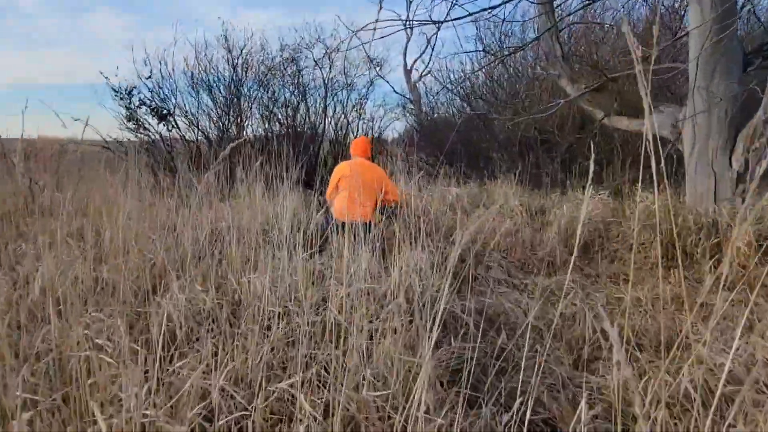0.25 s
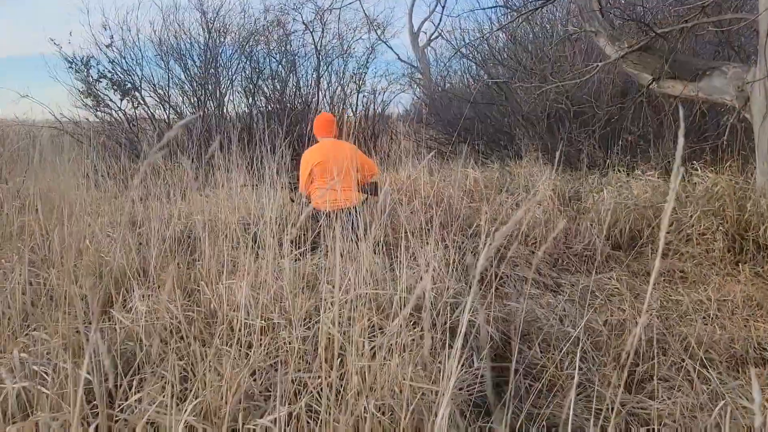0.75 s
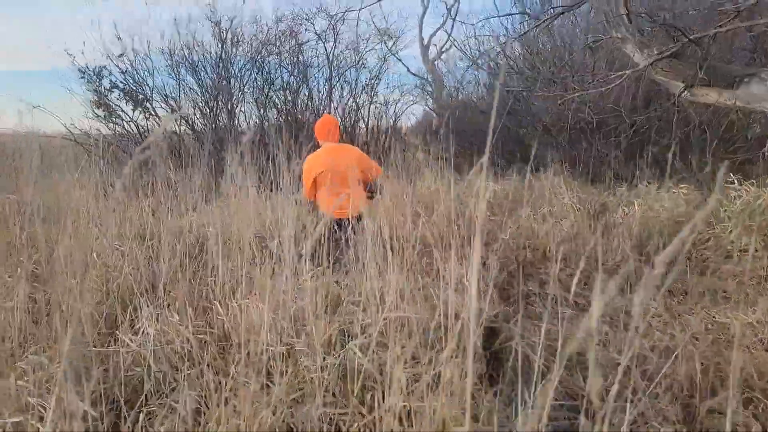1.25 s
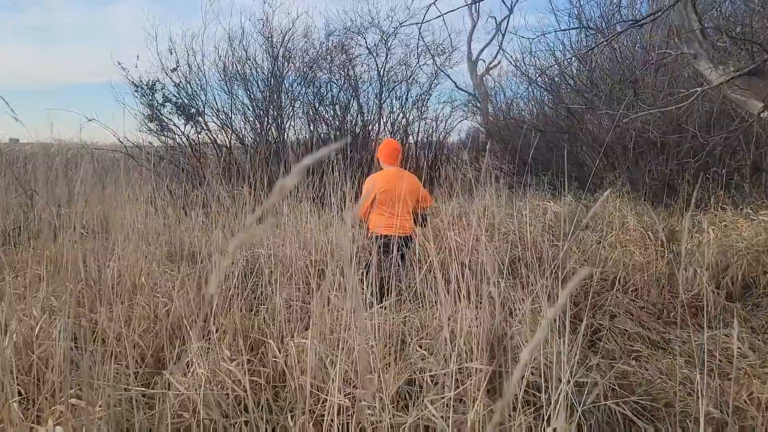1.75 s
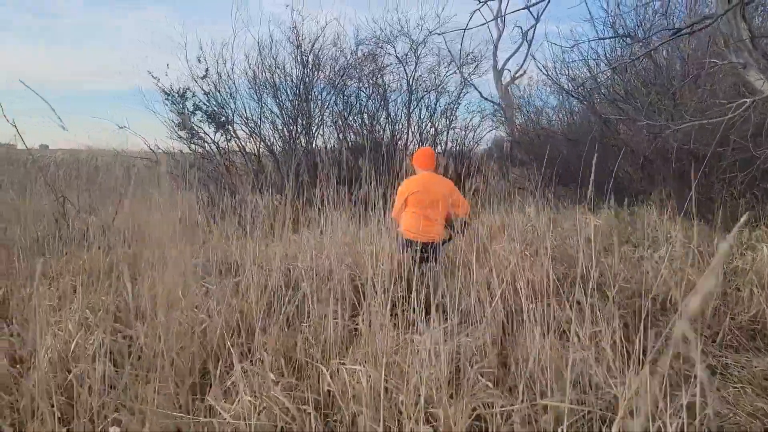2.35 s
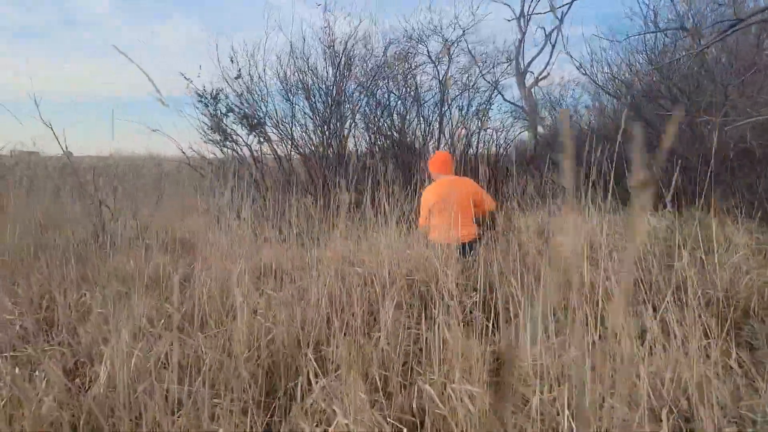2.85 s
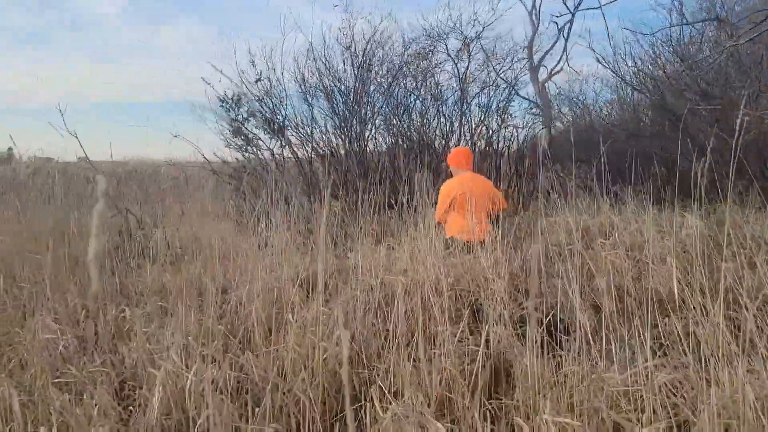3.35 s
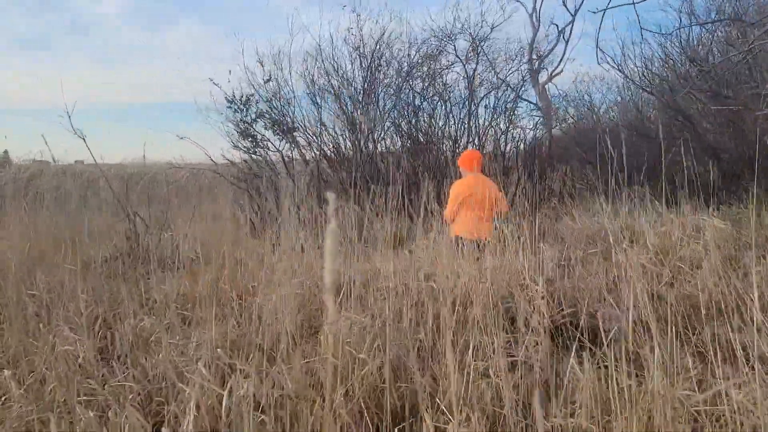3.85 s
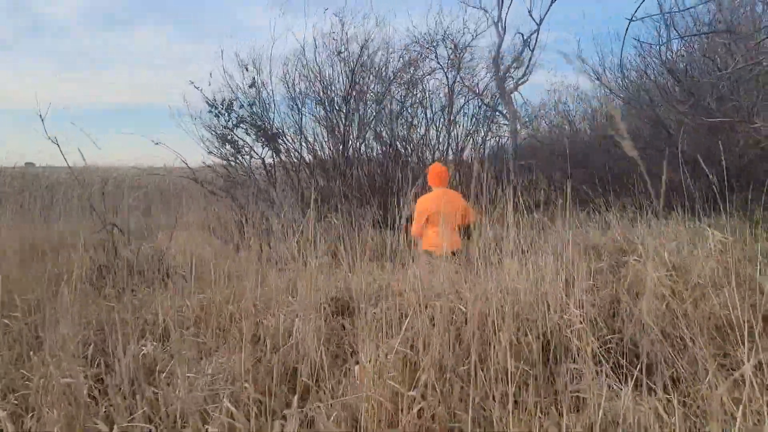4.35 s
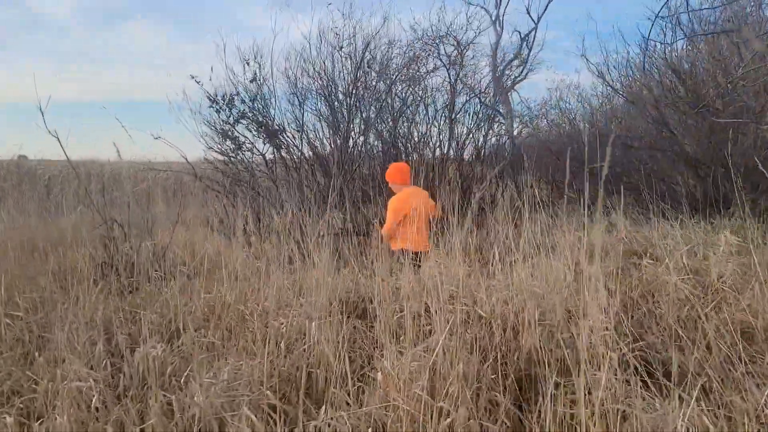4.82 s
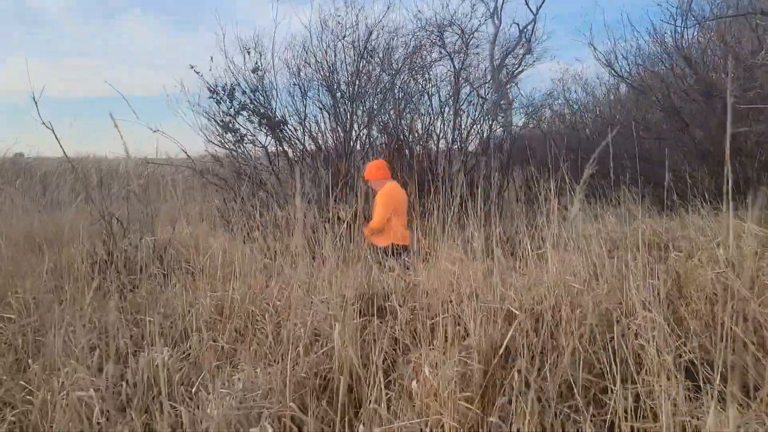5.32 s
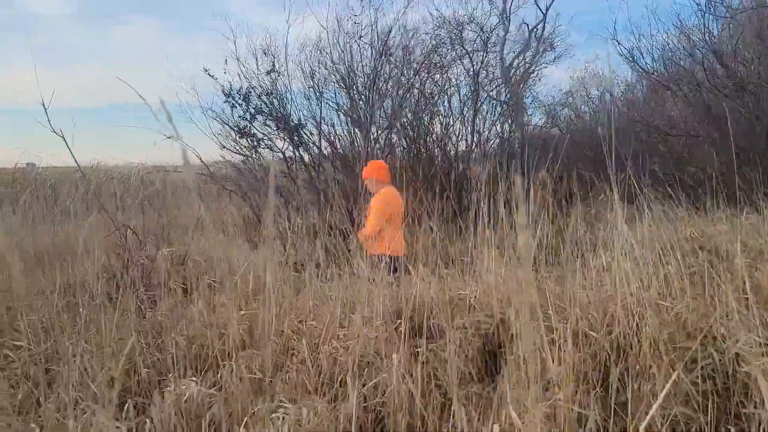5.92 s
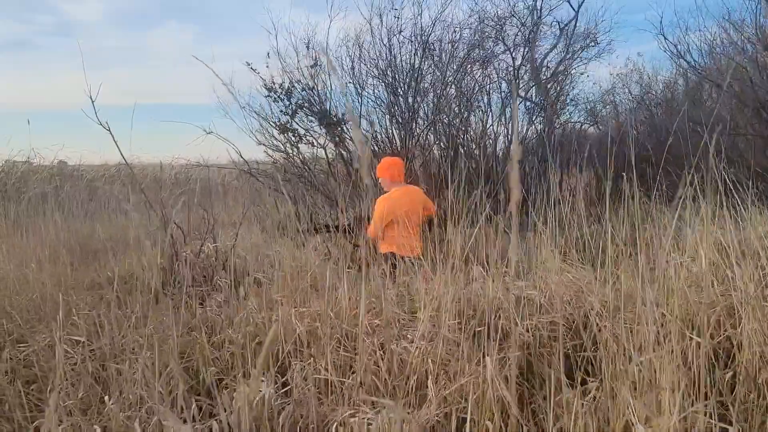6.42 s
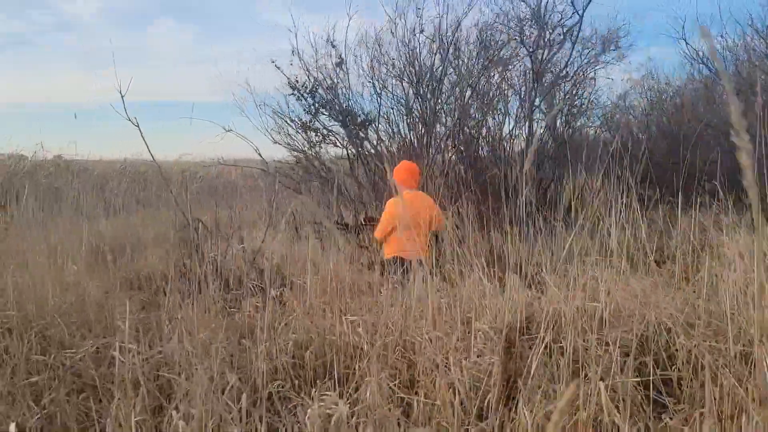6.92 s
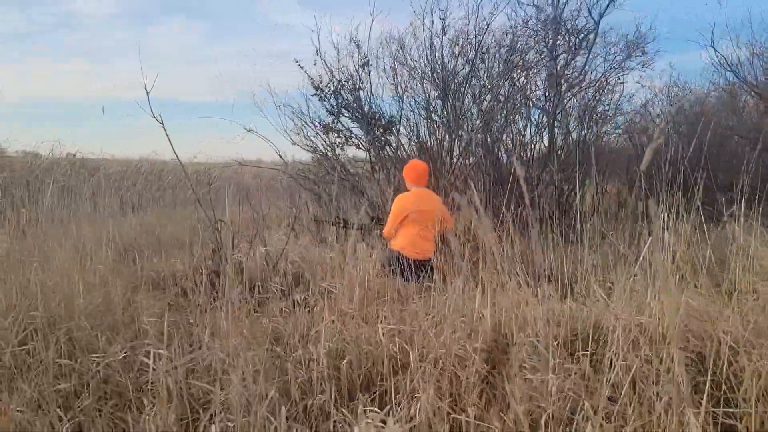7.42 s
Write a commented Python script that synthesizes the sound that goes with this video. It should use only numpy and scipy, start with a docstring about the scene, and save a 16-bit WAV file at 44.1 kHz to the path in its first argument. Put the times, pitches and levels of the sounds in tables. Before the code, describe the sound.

Close, dry swishing rises and falls with each stride as someone wades through a field of tall dead grass, while a second walker rustles more dully a little to the right. Boots land softly, crushing stems, and brittle stalks crack here and there. Low gusts rumble on the moving microphone, strongest soon after the start. Midway, blades tick sharply past, later a cluster of louder stalks breaks, and both keep walking.

```python
"""Two people walk through tall dry grass in a light wind, one close by, one further off to the right.
A thin swish on the left opens the scene. Then, stride after stride, legs sweep the blades and crush
stems underfoot, stalks snap and boots land softly. Soon after 1 s the strongest gusts buffet the two
microphone openings. Near 2 s comes the heaviest step, near 3.5 s blades flick sharply past, and just
after 6 s the loudest stalks break. Both walkers rustle on to the end."""
import sys
import numpy as np
from scipy import signal
from scipy.fft import rfft, irfft, next_fast_len
from scipy.io import wavfile
from scipy.ndimage import uniform_filter1d, map_coordinates

SR = 44100
rng = np.random.default_rng(int(sys.argv[2]) if len(sys.argv) > 2 else 0)


def to_wav(s):
    """Save 16-bit WAV."""
    ch = np.atleast_2d(s).T  # columns
    pcm = np.round(np.clip(ch, -1, 1) * 32767)  # PCM
    wavfile.write(sys.argv[1], SR, pcm.astype(np.int16))


N = 338247
SIDES = np.array([[1], [-1]])  # left, right; a balance in dB is the left level minus the right


def amp(db):
    """Turns a level in dB into a gain."""
    return 10 ** (np.asarray(db) / 20)


def unit(x):
    """Scales x to an average power of 1."""
    return x / np.sqrt(np.mean(x ** 2) + 1e-20)


def curve(rows):
    """Joins (time, value) points with straight lines, one value per sample."""
    return np.interp(np.arange(N) / SR, *np.transpose(rows))


def wobble(rate):
    """A smooth curve through `rate` random values a second."""
    knots = rng.standard_normal(int(N * rate / SR) + 4)
    return map_coordinates(knots, [np.arange(N) * rate / SR])


def coloured(x, points):
    """Filters x to follow (frequency, level) points; the filter rings after a sound, never before."""
    m = 16384
    hz, db = np.transpose(points)
    gain = amp(np.interp(np.log(np.fft.rfftfreq(m, 1 / SR) + 1), np.log(hz + 1), db))
    cepstrum = irfft(np.log(gain), m)
    cepstrum[1:m // 2] *= 2
    cepstrum[m // 2 + 1:] = 0
    response = irfft(np.exp(rfft(cepstrum)), m)
    size = next_fast_len(N + m, real=True)
    return irfft(rfft(x, size) * rfft(response, size), size)[..., :N]


def crackle(spectrum, count, spread_db, lag_s, scatter_s):
    """Tiny random clicks; each has its own direction, so its own delay from left to right."""
    when, size, direction = rng.random(count), rng.standard_normal(count), rng.standard_normal(count)
    size = size * amp(spread_db * rng.standard_normal(count))
    pad = 64
    left = pad + when * N
    right = left + SR * (lag_s + scatter_s * direction)
    clicks = [np.bincount(np.clip(at, 0, None).astype(int), size, N + pad)[pad:N + pad]
              for at in (left, right)]
    return unit(coloured(np.array(clicks), spectrum))


def patchy(x, depth_db):
    """Random gain in patches about 300 Hz by 60 ms: each bunch of grass has its own tone."""
    spectra = signal.stft(x, nperseg=512)[2]
    patches = uniform_filter1d(rng.standard_normal(spectra.shape[1:]), size=3, axis=0)
    patches = uniform_filter1d(patches, size=10, axis=1)
    return unit(signal.istft(spectra * amp(depth_db * unit(patches)), nperseg=512)[1][:, :N])


def swell(s, rise, hold, change_db, fall):
    """Power each millisecond: rises until time s, drifts for `hold` seconds, falls; slopes in dB/s."""
    t = np.arange(0, N / SR, .001) - s
    db = rise * np.minimum(t, 0) + change_db * np.clip(t / hold, 0, 1) - fall * np.maximum(t - hold, 0)
    return amp(db) ** 2


def gains(power):
    """Turns rows of power per millisecond into gain per sample."""
    ms = np.arange(N) / SR * 1000
    return np.array([np.interp(ms, np.arange(len(row)), np.sqrt(row)) for row in power])


def add(track, s, db, balance_db, shape, lag_s):
    """Places one short sound in both channels, the right one lag_s later."""
    for side, at in enumerate((round(s * SR), round((s + lag_s) * SR))):
        track[side, at:at + len(shape)] += amp(db + balance_db / 2 * SIDES[side, 0]) * shape


# tone of the wind's rumble: (frequency [Hz], level [dB])
WIND_TONE = [(15, -14), (30, -7), (48, -1.5), (80, -3), (110, -15.5), (200, -43), (1000, -46)]
# gusts: (time [s], hold [s], left level [dB], right level [dB])
WIND_GUSTS = [(0.15, 0.16, -50, -40), (1.218, .06, -21, -42), (1.33, .08, -20.5, -26),
              (1.45, 0.12, -24, -18), (1.66, .03, -41, -31), (1.82, 0.051, -33, -26), (2.07, .08, -27, -40),
              (2.24, 0.086, -21, -31), (2.6, .08, -23, -29), (2.77, .05, -40, -28),
              (2.925, 0.059, -36, -27), (3.45, .06, -30, -45), (4.08, .06, -36, -34),
              (4.552, 0.068, -26, -40), (4.95, .08, -26, -41), (5.073, 0.041, -25, -25),
              (5.202, 0.061, -25, -30), (5.3, .08, -33, -45), (5.47, 0.073, -48, -34),
              (6.774, 0.074, -41, -30)]
# single swirls of air: (time [s], level [dB], balance [dB])
WIND_SWIRLS = [(1.236, -23, 19), (1.334, -22, 16), (1.376, -26, -25), (1.409, -20, 24), (1.436, -11, 8),
               (1.454, -16, -8), (1.48, -19, -16), (1.544, -18, -12), (1.59, -26, -16), (1.655, -21, -12),
               (2.055, -23, 16), (2.181, -21, 14), (2.235, -22, -10), (2.27, -24, 14), (2.297, -19, 16),
               (2.615, -27, 16), (2.651, -24, 14), (2.765, -27, -8), (2.991, -32, -14), (4.11, -22, -4),
               (5.005, -23, 16), (5.071, -22, 20), (5.109, -21, -16), (5.209, -12.5, 15), (6.779, -29, -10),
               (6.88, -24, -10)]


def wind():
    """Churning air rumbles separately on each microphone opening; a swirl sucks, then pushes."""
    calm_power = amp(-42.5) ** 2
    gust_power = sum(swell(s, rise=90, hold=hold, change_db=0, fall=99) * amp(db)[:, None] ** 2
                     for s, hold, *db in WIND_GUSTS)
    lumps = amp(2.8 * np.array([wobble(16), wobble(15)]))
    rumble = unit(lumps * coloured(rng.standard_normal((2, N)), WIND_TONE))
    track, t = np.zeros((2, N + SR)), np.arange(SR // 8) / SR
    swirl = -1.8 * np.sin(2 * np.pi * 64 * t) * amp(-60 * t / 0.068) * (1 - np.exp(-t / 0.0027))
    for s, db, balance_db in WIND_SWIRLS:
        add(track, s, db, balance_db, swirl, lag_s=0.001)
    return gains(calm_power + gust_power) * rumble + track[:, :N]


# tone of grass heard from afar: (frequency [Hz], level [dB])
FAR_TONE = [(100, -12.5), (400, 1), (1300, 6), (2500, -10.5), (6000, -12), (16000, -16.5)]
# loudness of the far walker: (time [s], level [dB])
FAR_LEVELS = [(0.0, -23.5), (0.5, -27.5), (0.72, -29), (0.94, -23.5), (2.39, -23), (3.1, -25), (3.67, -26),
              (3.85, -25), (3.97, -31), (4.2, -22.5), (5.02, -27), (5.47, -28.5), (6.24, -22), (6.51, -28),
              (7.2, -27.5), (7.67, -30)]


def far_walker():
    """A dense rustle, dulled by distance, that reaches the right side first and a little louder."""
    rustle = crackle(FAR_TONE, count=200000, spread_db=2.5, lag_s=-.0003, scatter_s=.0001)
    return amp(curve(FAR_LEVELS) + 1.1 * wobble(4.7) - SIDES) * rustle


# a narrow hiss near 6 kHz: (frequency [Hz], level [dB])
SWISH_TONE = [(4500, -29), (5600, -9), (6000, -1), (6400, -6), (7500, -37)]


def swish():
    """Something smooth slides past the left microphone opening at the start."""
    level_db, balance_db = -20.5, 11
    hiss = unit(coloured(rng.standard_normal((2, N)), SWISH_TONE))
    power = swell(0.046, rise=62, hold=0.1, change_db=0.17, fall=150)
    return amp(level_db + balance_db / 2 * SIDES) * gains([power]) * hiss


# boots landing: (time [s], level [dB], pitch [Hz], balance [dB])
BOOT_STEPS = [(0.217, -3, 486, 1), (0.576, -15, 620, -4), (1.1226, -13, 520, 0), (1.232, -16, 510, -1),
              (1.69, -20, 590, -4), (1.948, 0, 724, -4), (2.055, -15, 520, -10), (2.147, -2, 600, 1),
              (2.056, -15, 191, -6), (2.209, -5, 590, -5), (2.526, -12, 566, -7), (2.581, -24, 360, -4),
              (2.834, -8, 427, -5), (2.9004, -14, 540, -14), (3.291, -22, 556, -9), (3.565, -6, 362, 2),
              (4.098, -11, 342, 0), (4.252, -16, 220, -4), (4.36, -10, 450, 1), (4.9395, -13, 270, -1),
              (5.225, -4, 530, 0), (5.42, -18, 370, -12.5), (5.646, -15, 480, -3), (5.947, -8, 520, -5),
              (6.084, -8, 440, 10), (6.129, -14, 540, -1), (6.2582, -8, 600, 7), (6.5144, -10, 390, 1),
              (6.779, -21, 220, -6), (6.847, -13, 600, -2), (7.152, -7.5, 560, 5), (7.474, -17, 340, -5)]


def boots():
    """Each boot gives one dull push; soft soil lets it last only a few cycles."""
    track, t = np.zeros((2, N + SR)), np.arange(SR // 20) / SR
    onset = 1 - np.exp(-t / 0.00052)
    for s, db, hz, balance_db in BOOT_STEPS:
        push = amp(-60 * t * hz / 6) * np.cos(2 * np.pi * hz * t)
        add(track, s, db, balance_db, push * onset, lag_s=.0001)
    return track[:, :N]


# blades flicking past: (time [s], level [dB], balance [dB])
BLADE_FLICKS = [(0.6191, -10, -9), (0.696, -12, -4), (1.3995, -9, -2), (2.8345, -9, -3), (2.8524, -8, -2),
                (2.9418, 0, -7), (2.9518, -6, -5), (3.1786, -13, -4), (3.5174, 3, -5), (3.5611, 0, -3),
                (3.5815, -3, -3), (4.189, -11, -1), (5.0414, -6, -6), (5.1552, -2, -6), (5.7725, -12, -4),
                (6.0328, -5, -2), (6.772, -10, -6), (6.895, -5, 2), (6.9317, -12, -7), (7.152, -7, -5)]


def blade_flicks():
    """Thin blades flick past the microphone, each with a bare, high tick."""
    track, t = np.zeros((2, N + SR)), np.arange(SR // 20) / SR
    for s, db, balance_db in BLADE_FLICKS:
        hz = 12000 * np.exp(0.074 * rng.standard_normal())
        tones = np.sin(2 * np.pi * hz * t) + 0.68 * np.sin(2 * np.pi * .55 * hz * t)
        tick = tones * amp(-60 * t / 0.0036)
        add(track, s, db, balance_db, tick / np.abs(tick).max(), lag_s=0.00008)
    return track[:, :N]


# stalks breaking: (time [s], level [dB], pitch [Hz], balance [dB], delay on the right [ms])
STALK_SNAPS = [(0.22, -7, 1300, 0, .03), (0.43, -11, 2410, 3, .1), (0.671, -12, 1220, -3, 0.082),
               (0.828, -9, 3090, 2, .07), (1.287, -14, 1990, 0, 0), (1.7448, -7.5, 1450, -4, 0.14),
               (2.0678, -13, 2250, 3, .18), (2.444, -14, 2670, -1, .2), (2.4906, -3, 2050, -2, 0.22),
               (2.8255, -11, 2740, 0, 0.089), (2.834, -6, 2160, 0, .11), (2.851, -9, 1500, 2, .14),
               (2.8718, -10, 2000, 3, .1), (2.9843, -13, 1690, -3, 0.072), (3.704, -13, 2090, -2, 0.22),
               (3.812, -5.5, 1390, -1, 0.049), (4.1, -13, 1500, 0, .1), (4.227, -14, 1300, 0, .1),
               (4.355, -10, 3380, -3, 0.12), (4.94, -7, 1960, 0, 0.093), (5.0415, -6, 1890, 3, .07),
               (6.1313, 0, 2350, 2, 0.13), (6.1444, -6, 2100, -6, 0.2), (6.2599, -3, 2000, 0, .16),
               (6.2614, -3, 2300, -3, .16), (6.305, -11, 2390, 1, .18), (6.344, -13, 1150, 2, .1),
               (6.367, -14, 1600, -2, 0.22), (6.582, -16, 1300, 0, 0), (6.7163, -4.5, 2800, 0, 0.12),
               (7.5922, -16, 2660, -6, 0.12), (7.612, -12, 2390, 4, 0.091)]


def stalk_snaps():
    """A thick stalk cracks, bends as it parts and rings briefly at its pitch."""
    track, t = np.zeros((2, N + SR)), np.arange(SR // 20) / SR
    for s, db, hz, balance_db, lag_ms in STALK_SNAPS:
        ring = amp(-60 * t / 0.005) * (np.sin(2 * np.pi * hz * t) + 0.23 * np.cos(np.pi * hz * t))
        bend = 0.22 * amp(-60 * t / 0.017) * np.cos(2 * np.pi * hz / 4 * t)
        crack = 0.45 * amp(-60 * t / 0.0033) * uniform_filter1d(rng.standard_normal(len(t)), size=4)
        add(track, s, db, balance_db, ring + bend + crack, lag_s=lag_ms / 1000)
    return track[:, :N]


# tone of the dead grass on the ground: (frequency [Hz], level [dB])
MAT_TONE = [(80, -5), (150, -3), (500, 1.5), (900, -4), (3000, -21.5)]
# its base loudness: (time [s], level [dB])
MAT_LEVELS = [(0, -28.5), (.35, -42), (.8, -30.5), (1.5, -36), (2.0, -34), (2.3, -35), (2.52, -28),
              (2.75, -37), (3.3, -38), (3.55, -29), (3.95, -47), (4.2, -33), (4.6, -34), (5.0, -34.5),
              (5.6, -41.5), (6.1, -27), (6.6, -38.5), (7.15, -30), (7.4, -36), (7.67, -30)]


def dead_grass(stem_gain):
    """The mat of dead grass gives way underfoot, louder while stems are being crushed."""
    crunch = crackle(MAT_TONE, count=20000, spread_db=0, lag_s=.0001, scatter_s=.00029)
    return (amp(curve(MAT_LEVELS)) + amp(-17) * stem_gain) * amp(2.25 * wobble(14)) * crunch


# tones of dry tips, blades and stems: (frequency [Hz], level [dB])
TIP_TONE = [(3000, -39), (8000, 1), (11000, -1), (16000, 1.5)]
BLADE_TONE = [(300, -40), (1500, -11.5), (3000, -2.5), (5000, -1), (9000, 1), (16000, -12)]
STEM_TONE = [(100, -19), (400, -12.5), (900, 3.5), (2000, 2), (3500, 2.5), (7000, -40.5), (16000, -52)]
# a second tone for the rustle, fuller near 2 kHz, hollower near 4 kHz: (frequency [Hz], change [dB])
DRIFT_TONE = [(800, 1.5), (1400, -3), (2000, 2.5), (2500, -0.5), (3200, -3.5), (4300, -3.5), (5500, 1.5),
              (7000, 2.5), (9000, -2)]
# how much of that tone is heard: (time [s], share [0-1])
DRIFT_SHARE = [(0, 0.24), (1.5, 0.13), (2.3, 0.82), (3, 0.1), (3.7, 0.66), (4.4, 0.14), (5.1, 0.74),
               (5.8, 0.45), (6.8, 0.46), (7.3, 1), (7.67, 1)]


def standing_grass(blade_gain, tip_gain, stem_gain):
    """Tips, blades and stems crackle against a leg; bunches of grass make the level flutter."""
    bunch = wobble(20)
    tips = crackle(TIP_TONE, count=400000, spread_db=1.5, lag_s=.00015, scatter_s=.0001)
    blades = crackle(BLADE_TONE, count=250000, spread_db=0.5, lag_s=.00015, scatter_s=.00008)
    stems = crackle(STEM_TONE, count=60000, spread_db=0, lag_s=.00011, scatter_s=.00005)
    stalks = crackle(BLADE_TONE, count=2500, spread_db=2, lag_s=.00015, scatter_s=.00017)
    fizz = tip_gain * amp(0.73 * bunch + 0.25 * wobble(5.2)) * patchy(tips, depth_db=1.5)
    sweep = blade_gain * amp(0.14 * bunch + 0.43 * wobble(6.8)) * patchy(blades, depth_db=2.5)
    crush = stem_gain * amp(0.64 * bunch + 0.89 * wobble(8.2)) * patchy(stems, depth_db=3)
    rustle = fizz + sweep + crush + blade_gain * amp(-19) * stalks
    share = curve(DRIFT_SHARE)
    return (1 - share) * rustle + share * coloured(rustle, DRIFT_TONE)


# legs sweeping through the grass: (end of rise [s], rise [dB/s], hold [s], change while held [dB],
# fall [dB/s], blade level [dB], tips above blades [dB], stems above blades [dB])
LEG_SWEEPS = [(0.067, 53, 0.058, 0, 76, -13, -3, -7.5), (0.218, 60, .08, -1.5, 40, -20.5, -6, -10),
              (0.405, 40, 0.036, 0, 56, -14.5, -8, -8.5), (0.563, 42, 0.12, -1, 60, -28.5, 11, -4),
              (0.765, 260, 0.081, 4, 29, -13, 2, -8.5), (1.048, 35, 0.028, -0.5, 60, -14, -2.5, -12),
              (1.296, 50, 0.18, 1, 35, -19.5, 0.5, -9.5), (1.62, 24, .05, -5, 30, -29, 6, -13),
              (1.824, 57, 0.16, 0.5, 65, -13.5, 0.5, -7.5), (2.192, 81, 0.3, -2, 48, -9.5, 3, -10),
              (2.72, 53, 0.044, -5, 55, -17, 0, -10), (2.843, 120, .02, -0.5, 111, -16, 2.5, -8.5),
              (2.956, 100, 0.3, 2, 42, -22, 1, -27.5), (3.494, 101, 0.024, -2, 48, -16.5, 3, -5.5),
              (3.557, 72, 0.29, -3, 103, -11.5, 3.5, -8.5), (4.086, 106, .02, 0.5, 60, -20.5, 2.5, -7),
              (4.178, 61, 0.023, 0.5, 80, -23.5, 1, -12), (4.324, 46, 0.25, 1, 34, -21.5, 2, -12),
              (4.896, 59, 0.069, 1, 37, -16, 8, -4.5), (5.19, 35, 0.053, 3.5, 62, -21, -1, -8),
              (5.785, 78, 0.036, 0.5, 39, -21, 3, -9.5), (6.03, 115, 0.34, 1.5, 62, -15.5, 6, -7),
              (6.496, 10.5, 0.038, 1, 90, -21.5, -9, -21), (6.72, 62, 0.21, -0.5, 40, -21, 4.5, -6.5),
              (7.245, 50, 0.12, 1, 43, -19.5, 11, -2), (7.5, 42, .2, 2, 30, -20, 3, -8)]
# steady rustle of bent grass springing back: (blade level [dB], tip level [dB], stem level [dB])
SETTLING_GRASS = [-30, -35, -36.5]
# where the legs are heard as the carried microphone swings round: (time [s], balance [dB])
LEG_BALANCE = [(0, 3.5), (0.42, 3.5), (0.64, -1), (1.1, 1), (1.7, 1), (2.4, 1), (2.9, 1), (4.2, 0), (5, 1),
               (5.9, 0.5), (7, 0.5), (7.4, 1.5), (7.67, 0.5)]


def near_walker():
    """Each sweep of a leg swells the rustle of the standing grass and the crunch underfoot."""
    power = amp(SETTLING_GRASS)[:, None] ** 2
    for *shape, db, tips_db, stems_db in LEG_SWEEPS:
        power = power + swell(*shape) * amp([[db], [db + tips_db], [db + stems_db]]) ** 2
    blade_gain, tip_gain, stem_gain = gains(power)
    grass = standing_grass(blade_gain, tip_gain, stem_gain) + dead_grass(stem_gain)
    return amp(curve(LEG_BALANCE) / 2 * SIDES) * grass


def scene():
    """Everything that reaches the two microphone openings."""
    return wind() + far_walker() + swish() + boots() + blade_flicks() + stalk_snaps() + near_walker()


# tone of each opening, whose hollow rings near 6.6 and 12.5 kHz: (frequency [Hz], gain [dB])
LEFT_MIC_TONE = [(100, -23.5), (300, -24), (700, -25.5), (1300, -19), (2000, -14.5), (2800, -11.5),
                 (4500, -10.5), (5600, -12), (6800, -9.5), (7900, -19.5), (10500, -12), (12400, -7),
                 (13700, -5), (15400, -5)]
RIGHT_MIC_TONE = [(100, -23), (300, -22), (700, -22.5), (1300, -16.5), (2100, -11), (4200, -9.5),
                  (5500, -8), (6600, -3.5), (8200, -15.5), (9000, -12.5), (11300, -8.5), (12500, -2),
                  (13400, -4), (15400, -7)]


def record(dry):
    """Each microphone opening colours the sound in its own way; the highest treble is cut off."""
    top_hz = 15520
    heard = np.array([coloured(dry[0], LEFT_MIC_TONE), coloured(dry[1], RIGHT_MIC_TONE)])
    size = next_fast_len(N + 4096)
    kept = np.fft.rfftfreq(size, 1 / SR) < top_hz
    return irfft(rfft(heard, size) * kept, size)[:, :N]


dry = scene()
out = record(dry)
to_wav(out)
```